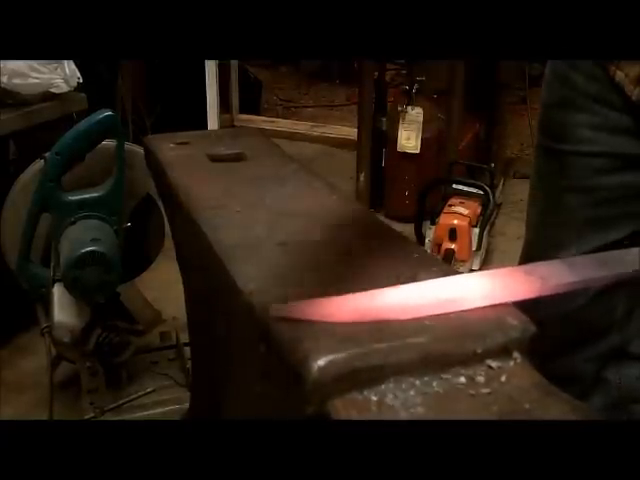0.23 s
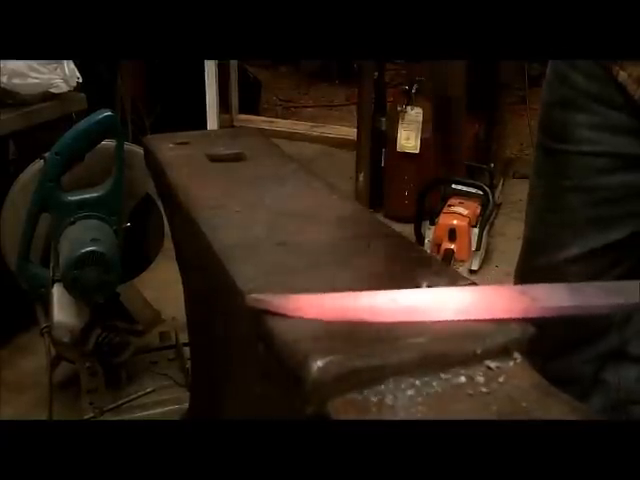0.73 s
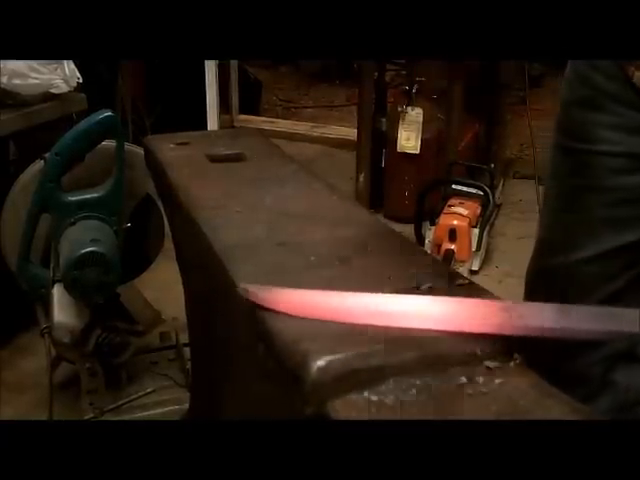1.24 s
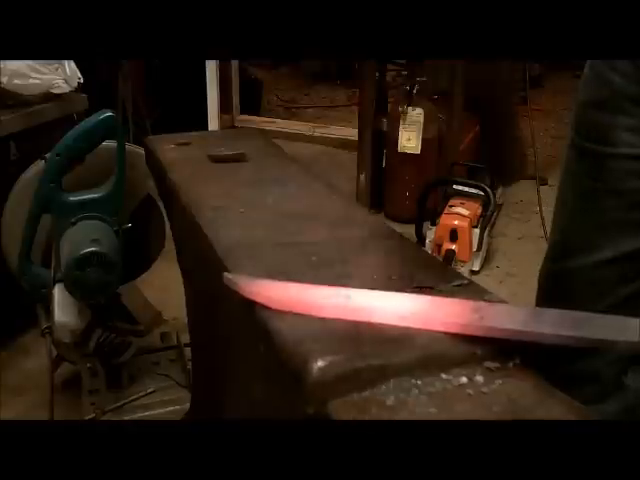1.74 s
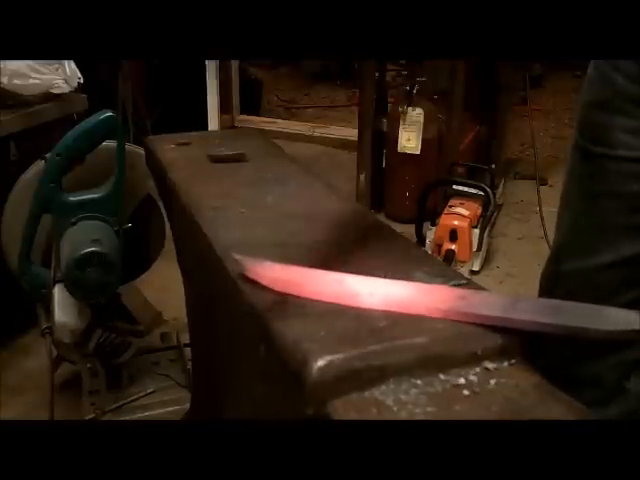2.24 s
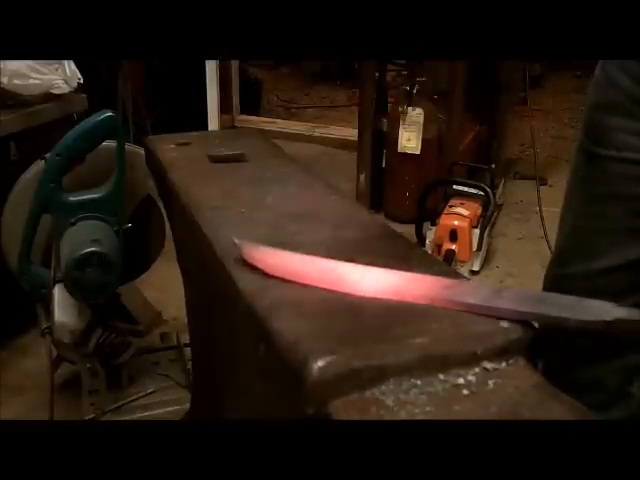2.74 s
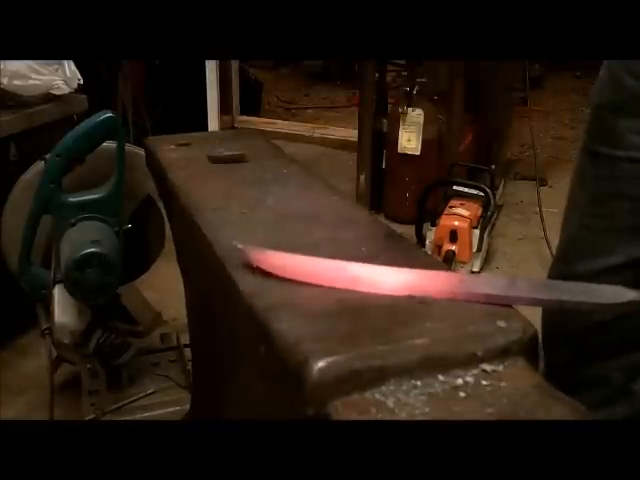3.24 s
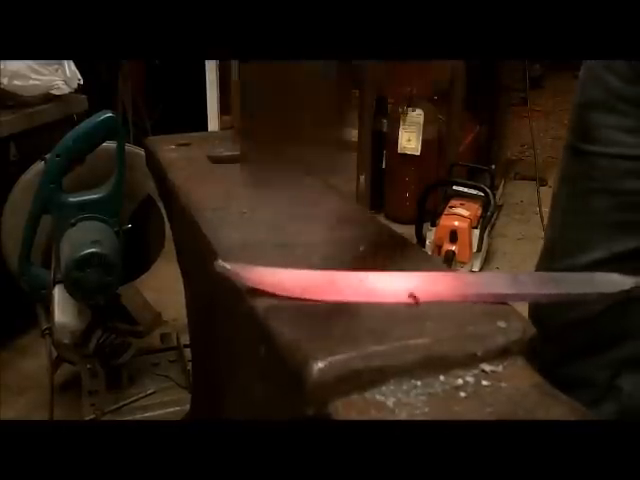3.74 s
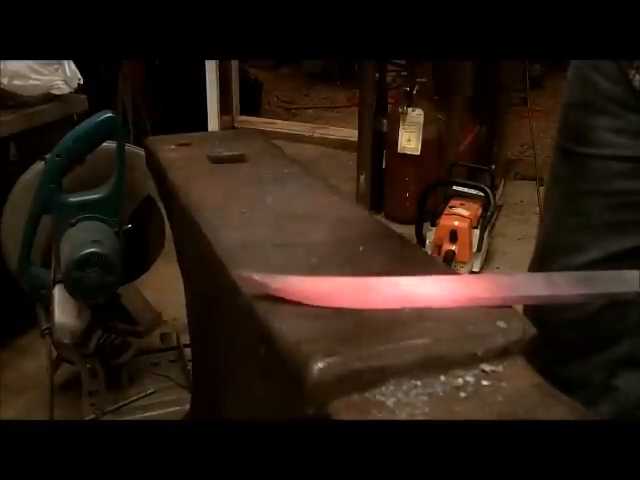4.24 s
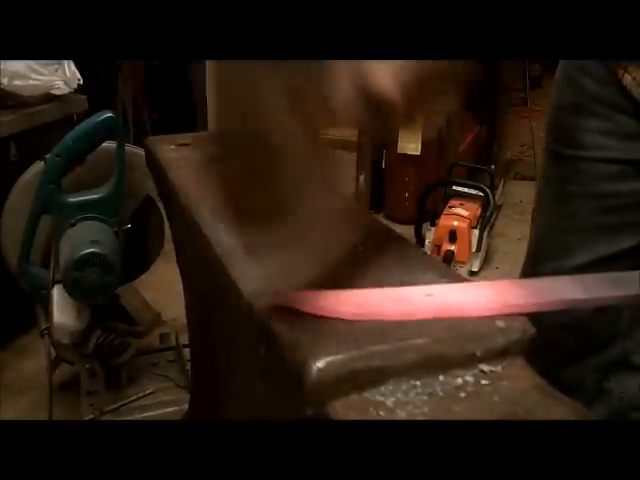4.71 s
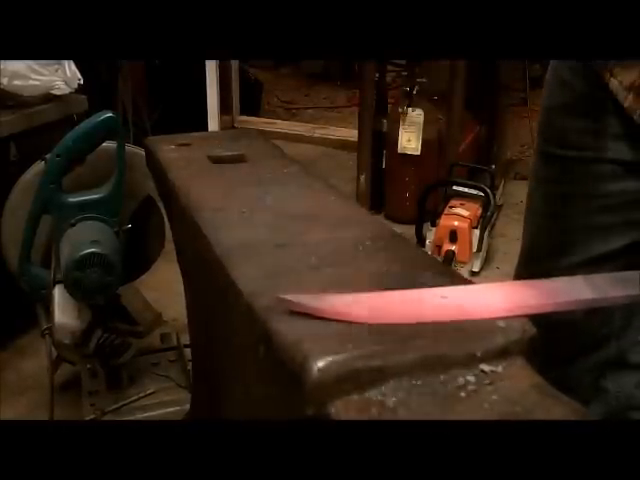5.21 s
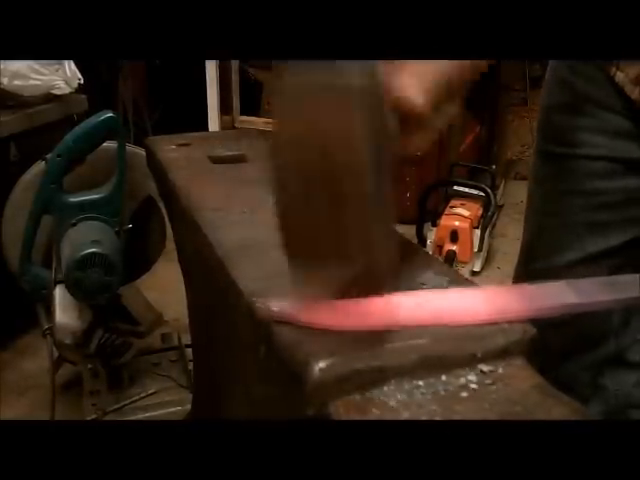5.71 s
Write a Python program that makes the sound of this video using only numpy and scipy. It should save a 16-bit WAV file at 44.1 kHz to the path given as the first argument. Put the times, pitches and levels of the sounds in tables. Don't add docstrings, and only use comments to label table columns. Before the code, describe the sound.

The stretch opens on the fading ring of an earlier anvil blow. From about 0.2 s a hand hammer hits hot steel every third of a second, seventeen blows ending near 5.8 s, with slightly wider gaps around 2.2 to 3.8 s. Every blow is a loud, hard crack, cut flat at the peak, with a very short damped clink from the bar and varying knock or thud. A clear high ring near 1.3 kHz sustains under brighter, shimmering tones around 3 to 6 kHz, changing colour from hit to hit. Low bench rumble and workshop rattle die quickly over faint room hum. Tiny flakes of scale tick near 3.0, 4.0 and 4.3 s; a barely audible squeak comes at 5.05 s. The small close recorder is near mono, ducking after blows and recovering, so the ring swells back before the next strike. Ringing continues to the end.

```python
import sys
import numpy as np
from scipy import signal
from scipy.fft import rfft, irfft
from scipy.io import wavfile
from scipy.ndimage import uniform_filter1d

SR = 44100
rng = np.random.default_rng(int(sys.argv[2]) if len(sys.argv) > 2 else 0)


def inscribe(sig):
    pcm = np.round(np.clip(np.atleast_2d(sig).T, -1, 1) * 32767)
    wavfile.write(sys.argv[1], SR, pcm.astype(np.int16))


def voltage_ratio(decibels):
    exponent = np.asarray(decibels, float) / 20
    return 10 ** exponent


N = 262836
TIME = np.arange(N) / SR
EARLIER_BLOW_S = -0.107

# [t/s, crack peak/dB, thud/dB, knock/dB, bright edge/dB]
HAMMER_BLOWS = [(0.2271, -4.5, -30.5, -11.5, -29), (0.565, -3.5, -32.5, -22, -29),
                (0.893, -5, -27, -7.5, -33.5), (1.226, -2.5, -27, -13, -26.5),
                (1.5587, -4.5, -25.5, -13, -24), (1.8954, -2, -25, -11.5, -32),
                (2.2449, -0.5, -64, -31, -44.5), (2.6199, -1, -53, -45, -24.5),
                (3.0012, -2, -27.5, -37, -19.5), (3.421, -3, -17, -28, -20),
                (3.7871, -5, -25.5, -38, -18.5), (4.116, -2.5, -36.5, -72.5, -19),
                (4.4444, -2, -33.5, -63, -19), (4.791, -1.5, -25.5, -12.5, -24),
                (5.132, -1.5, -22, -63, -25.5), (5.4792, -5, -22.5, -38, -20),
                (5.8117, -1, -26, -12.5, -30)]
# [main ring/dB, gain duck/dB, hot bar ring/dB, dull slap/dB]
AFTER_BLOW = [(-21.5, 10, -15.5, -30), (-22.5, 7, -15.5, -27), (-24.5, 8.5, -18.5, -24),
              (-22, 11, -14.5, -19.5), (-23, 8.5, -17.5, -23.5), (-25.5, 10, -15.5, -24),
              (-24, 10.5, -15, -22), (-27, 3.5, -21, -28), (-23, 6, -18.5, -33.5), (-21, 10, -12.5, -29.5),
              (-23, 7.5, -17, -18), (-24, 3, -25, -39.5), (-22.5, 2, -23.5, -33), (-23.5, 4, -21.5, -30.5),
              (-22, 7, -17.5, -22.5), (-25, 7.5, -19, -28), (-24.5, 10, -14, -26.5), (-25, 9.5, -18.5, -25)]
# [hammer head/dB, lower twin/dB, upper twin/dB, high modes/dB]
STRIKE_BALANCE = [(1, -1.5, 1.5, 3), (0, 0, 3, -2.5), (4.5, -0.5, 6.5, 2.5), (2, 0, 3, 5),
                  (1, -0.5, 2.5, 2), (4.5, 3.5, -1.5, 7.5), (2.5, 8.5, -12.5, 6), (-.5, 6, -13, -6.5),
                  (-2, 4, -13, -7.5), (-6, 6, -10.5, 0.5), (-4.5, -5.5, -8.5, 1.5), (-6, -6, -8.5, -8),
                  (-6.5, -14.5, -6, -19), (-6, -9.5, -1, -6), (-1, -8.5, 1.5, -2), (2, -11.5, 8, 2),
                  (2.5, 4, 4.5, 6.5), (5, 0, 6.5, 6)]


def at_hz(points, hz):
    point_hz, point_db = np.transpose(points)
    return np.interp(np.log(hz), np.log(point_hz), point_db)


def band(x, low_hz, high_hz):
    edges_hz = [low_hz, min(high_hz, 0.45 * SR)]
    return signal.sosfilt(signal.butter(2, edges_hz, "band", fs=SR, output="sos"), x)


def colour(x, spectrum):
    hz = np.maximum(np.arange(N // 2 + 1) * SR / N, 20)
    return irfft(rfft(x) * voltage_ratio(at_hz(spectrum, hz)), N)


def coloured(spectrum):
    x = colour(rng.standard_normal(N), spectrum)
    return x / x.std()


def since_blow():
    starts_s = np.r_[EARLIER_BLOW_S, np.array(HAMMER_BLOWS)[:, 0]]
    last = np.searchsorted(starts_s, TIME, "right") - 1
    return last, TIME - starts_s[last]


def per_blow(axis):
    column = np.array(HAMMER_BLOWS)[:, axis]
    return np.r_[column.mean(), column]


def dying(spectrum, fading):
    edges_hz = 22 * 2 ** (np.arange(30) / 3)
    white = rng.standard_normal((2, N))
    age_s = since_blow()[1]
    out, power = 0, 0
    for k, (low_hz, high_hz) in enumerate(zip(edges_hz, edges_hz[1:])):
        hz = np.sqrt(low_hz * high_hz)
        start_db = at_hz(spectrum, hz)
        power += voltage_ratio(start_db) ** 2 * (high_hz - low_hz) * 2 / SR
        fade = voltage_ratio(start_db - at_hz(fading, hz) * age_s)
        out = out + fade * band(white[k % 2], low_hz, high_hz)
    return out / np.sqrt(power)


def housing(x):
    # [f/Hz, width/Hz, depth/0-1]
    dips = [(2723, 1270, 1), (5400, 590, 1), (5460, 560, 1), (7840, 1000, 0.8), (7700, 1080, 1),
            (8530, 500, 0.8), (10890, 790, 0.9), (10990, 590, 0.9)]
    for hz, width_hz, depth in dips:
        b, a = signal.iirpeak(hz, hz / width_hz, fs=SR)
        x = x - depth * signal.lfilter(b, a, x)
    return x


def shop_db():
    return 5.5 + 0.34 * np.transpose(STRIKE_BALANCE)[0]


def shop():
    # [f/Hz, level/dB per Hz]
    tail_spectrum = [(30, -2.5), (100, 1.5), (350, -6.5), (1000, -9), (2100, 2), (4500, -3), (6500, -16),
                     (8000, -18.5), (9500, -15), (13000, -29), (16000, -50.5)]
    # [f/Hz, fade/dB per s]
    tail_fade = [(30, 70.5), (350, 91), (1000, 62), (2100, 61.5), (4500, 53), (9500, 83), (15000, 145.5)]
    # [f/Hz, level/dB per Hz]
    floor_spectrum = [(25, -17), (100, 2), (600, -4), (1500, 7), (4000, 2), (6500, -24.5), (9500, -16),
                      (15000, -37)]
    tail = voltage_ratio(shop_db()[since_blow()[0]] - 9.5) * dying(tail_spectrum, tail_fade)
    hum = voltage_ratio(-23.5) * coloured(floor_spectrum)
    air = signal.butter(12, 15100, fs=SR, output="sos")
    return signal.sosfilt(air, tail + hum)


def rumble():
    level_db, fade_db_per_s, lumps_db, top_hz = -25, 46, 3.5, 260
    lumps = uniform_filter1d(uniform_filter1d(rng.standard_normal(N), size=1500), size=1500)
    low = band(band(rng.standard_normal(N), 45, top_hz), 45, top_hz)
    envelope_db = level_db - fade_db_per_s * since_blow()[1] + lumps_db * lumps / lumps.std()
    return voltage_ratio(envelope_db) * low / low.std()


def small_sounds():
    # [t/s, peak/dB]
    scale_ticks = [(2.980, -42), (3.978, -43), (3.998, -41), (4.285, -45), (4.307, -38), (4.328, -36)]
    # [t/s, length/s, f/Hz, level/dB]
    bar_squeak = (5.055, .048, 740, -47)
    noise = band(band(rng.standard_normal(N), 8800, 10500), 8800, 10500)
    ticks = np.zeros(N)
    for start_s, peak_db in scale_ticks:
        ticks += voltage_ratio(peak_db) * np.exp(-((TIME - start_s - 0.002) / 0.003) ** 2) * noise
    start_s, length_s, hz, level_db = bar_squeak
    swell = np.sin(np.pi * np.clip((TIME - start_s) / length_s, 0, 1)) ** 0.5
    return ticks + voltage_ratio(level_db) * swell * np.sin(2 * np.pi * hz * TIME)


def bar():
    bar_hz = [
        [4704, 4710, 4755],
        [1633.8],
        [3907.6],
    ]
    # [level re family/dB, fade/dB per s]
    bar_modes = [
        [(-12.5, 150.5), (-14, 121.5), (-22, 299.5)],
        [(6.5, 270)],
        [(-2, 269)],
    ]
    # [level re bar/dB, share of its swing/1]
    bar_follows = [(0.5, .99), (-13.5, 0.34), (-12.5, 0.68)]
    last, age_s = since_blow()
    bar_db = np.transpose(AFTER_BLOW)[2]
    out = 0
    for (step_db, share), pitches_hz, family in zip(bar_follows, bar_hz, bar_modes):
        family_db = bar_db.mean() + step_db + share * (bar_db - bar_db.mean())
        for hz, (level_db, fade_db_per_s) in zip(pitches_hz, family):
            envelope = voltage_ratio(family_db[last] + level_db - fade_db_per_s * age_s)
            out = out + envelope * np.sin(2 * np.pi * hz * age_s)
    return out


def blows():
    # [f/Hz, level/dB per Hz]
    crack_spectrum = [(300, -38), (1400, -12.5), (3300, 3.5), (4800, -1), (6200, -16), (8000, -19),
                      (10000, -20), (14000, -18.5), (16500, -27.5)]
    # [f/Hz, level/dB, time constant/s]
    snap_modes = [(1338, -2.5, 0.0045), (3240, -19.5, 0.00054), (4900, -7.5, 0.0095), (5540, 4.5, 0.00074)]
    last, age_s = since_blow()
    crack_db, thud_db, knock_db, edge_db = [per_blow(axis)[last] for axis in (1, 2, 3, 4)]
    slap_db = np.transpose(AFTER_BLOW)[3, last]

    snap = 0
    for hz, level_db, tau_s in snap_modes:
        snap = snap + voltage_ratio(level_db) * np.sin(2 * np.pi * hz * age_s) * np.exp(-age_s / tau_s)
    noise = band(coloured(crack_spectrum), 1100, 15000)
    burst = noise * (1 - np.exp(-age_s / 0.000087)) * np.exp(-age_s / 0.002)
    crack = voltage_ratio(crack_db) * (voltage_ratio(-10.5) * snap + voltage_ratio(-1) * burst)

    edge = voltage_ratio(edge_db + 23.5) * band(noise, 5850, 24000) * np.exp(-age_s / 0.0011)
    swell = age_s / 0.003 * np.exp(1 - age_s / 0.0013)
    knock = voltage_ratio(knock_db + 4) * np.sin(2 * np.pi * 510 * age_s) * swell
    slap = voltage_ratio(slap_db + 21) * band(rng.standard_normal(N), 250, 1150) * np.exp(-age_s / 0.003)
    pressure = np.exp(-((age_s - 0.004) / 0.0012) ** 2)
    rebound = 0.18 * np.exp(-((age_s - 0.014) / 0.014) ** 2)
    push = voltage_ratio(thud_db + 11.5) * (pressure - rebound)
    return crack + edge + knock + slap + push


def family_shares():
    # [low pair/dB, middle family/dB]
    side_modes = [(4.5, -8), (4, -11), (8, 1), (2, -2), (3.5, -5.5), (5, 3), (-3.5, 5.5), (2.5, 0.5),
                  (-4, -4), (-3.5, -5), (2.5, -6.5), (3, -10), (2, -15), (-7, -7), (0, -13), (7, -5),
                  (-3.5, -3.5), (6, -0.5)]
    head, low_twin, high_twin, high = np.transpose(STRIKE_BALANCE)
    pair, middle = np.transpose(side_modes)
    return [pair,
            1.1 + 0.64 * pair + 0.2 * head,
            0.1 + 1.6 * head + 0.9 * low_twin,
            low_twin,
            high_twin,
            head,
            middle,
            1.3 + 0.66 * high,
            high,
            1.2 + 0.6 * high + 0.43 * head + 0.18 * pair]


def anvil():
    low_hz = [
        [1281.6],
        [1701.1],
        [2748.8],
        [3135.8],
        [3406.5],
    ]
    # [level re main ring/dB, extra fade/dB per s]
    low_modes = [
        [(-19, 13)],
        [(-16.5, 22.5)],
        [(-34, -7.5)],
        [(-4, 9.5)],
        [(-4.5, 13)],
    ]
    high_hz = [
        [3162.2],
        [3832.9, 4358.5, 4249.4],
        [5138.4, 12914, 7950],
        [5761.5, 5798.5, 13864],
        [6202.2, 6489.6, 6641.6, 7220, 9125, 9580, 9620, 10010, 13254, 13669, 14095, 14717],
    ]
    # [level re main ring/dB, extra fade/dB per s]
    high_modes = [
        [(8.2, 80)],
        [(-6, 57), (-15.5, 39), (-29, 27)],
        [(-9, 17.2), (-28.5, 61), (-46, 29)],
        [(-10.5, 17.6), (-6, 25.3), (-49, 20)],
        [(-24, 25), (-21.5, 54), (-32.5, 37), (-43.5, 36), (-42, 67), (-46.5, 88), (-37.5, 51), (-50, 26),
         (-49.5, 100), (-29, 260), (-33, 260), (-23.5, 300)],
    ]
    stray_rad = [3, 3, 3, .3, 3, 0, 3, 3, .3, 3]
    main_hz, twin_lead_rad, scatter_db = 1337.1, 0.37, 4.2
    last, age_s = since_blow()
    jumps, scatter = rng.standard_normal((2, len(HAMMER_BLOWS) + 1, 40))
    out = np.sin(2 * np.pi * main_hz * TIME + np.cumsum(1.163 * jumps[:, 0])[last])
    count = 1
    families = zip(family_shares(), stray_rad, low_hz + high_hz, low_modes + high_modes)
    for index, (share_db, stray, pitches_hz, family) in enumerate(families):
        lead_rad = twin_lead_rad * (index == 3)
        for k, (hz, (level_db, fade_db_per_s)) in enumerate(zip(pitches_hz, family)):
            spread_db = scatter_db * scatter[:, count] * (k > 1)
            envelope = voltage_ratio(level_db + (share_db + spread_db)[last] - fade_db_per_s * age_s)
            phase = 2 * np.pi * hz * age_s + stray * jumps[last, count] + lead_rad
            out += envelope * np.sin(phase)
            count += 1
    return np.sqrt(2) * out


def capsule(ring):
    # [f/Hz, level/dB]
    colour_in = [(1300, 1.5), (3150, 0), (3400, -9.5), (3900, 0.5), (5100, 7), (5800, 7), (8000, -4)]
    # [f/Hz, level/dB]
    colour_out = [(30, -23), (300, -22), (650, -24.5), (2000, -38.5), (4500, -27.5), (7000, -35.5),
                  (9000, -36.5), (11600, -29.5), (15000, -35)]
    last, age_s = since_blow()
    true_size = voltage_ratio(-35 * age_s - 0.43 * shop_db()[last])
    products = colour(colour(ring, colour_in) ** 2, colour_out)
    return band(true_size * products, 6.2, 18000)


def gain_control():
    duck_db_per_s, recover_db_per_s, ease_s, settle_s = 59.5, 42, 0.17, 0.027
    last, age_s = since_blow()
    start_db, duck_db = np.transpose(AFTER_BLOW)[:2, last]
    free_s = np.maximum(age_s - duck_db / duck_db_per_s, 0)
    back_db = recover_db_per_s * ease_s * (1 - np.exp(-free_s / ease_s))
    level_db = start_db - np.minimum(duck_db_per_s * age_s, duck_db) + back_db
    return voltage_ratio(uniform_filter1d(level_db, int(settle_s * SR), mode="nearest"))


def scene():
    gain = gain_control()
    ring = anvil()
    sustained = ring + housing(shop() + capsule(ring)) + rumble()
    mono = gain * sustained + bar() + housing(blows()) + small_sounds()
    return np.array([mono, mono])


def top_cut(x):
    return signal.sosfilt(signal.butter(12, 16650, fs=SR, output="sos"), x)


def record(dry):
    x = signal.sosfilt(signal.butter(10, 15800, fs=SR, output="sos"), dry)
    late_left = np.r_[0, x[0, :-1]]
    return top_cut(np.clip([late_left, x[1]], -1, 1))


dry = scene()
out = record(dry)
inscribe(out)
```